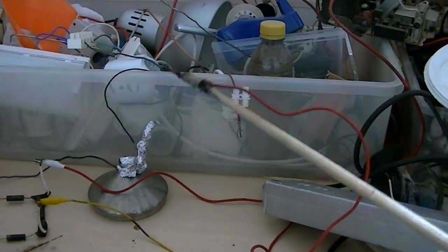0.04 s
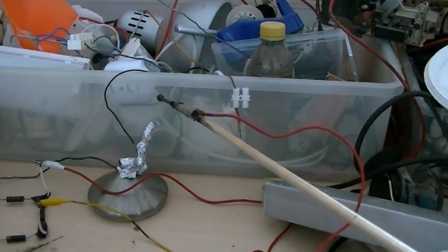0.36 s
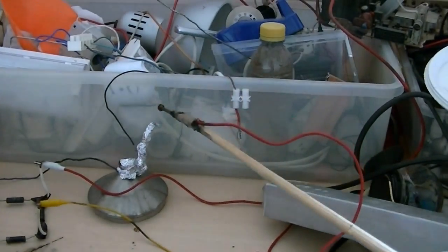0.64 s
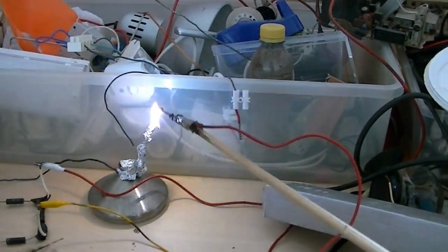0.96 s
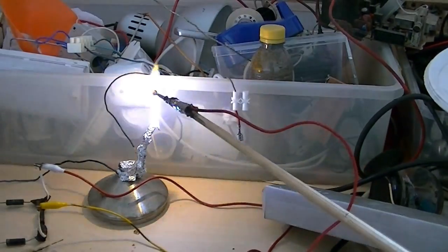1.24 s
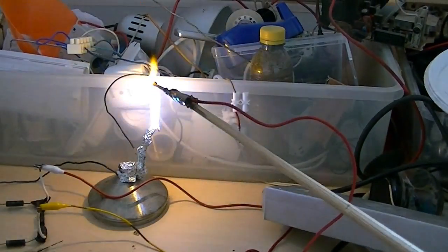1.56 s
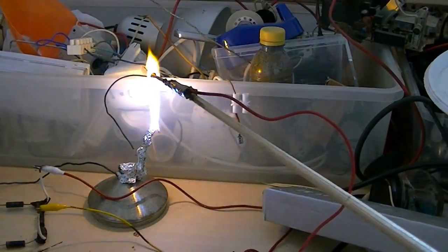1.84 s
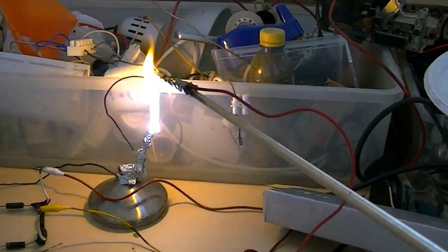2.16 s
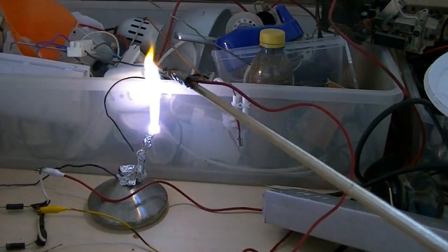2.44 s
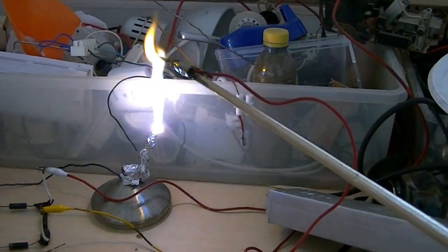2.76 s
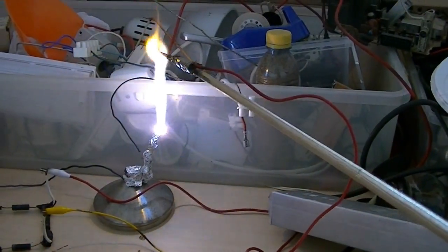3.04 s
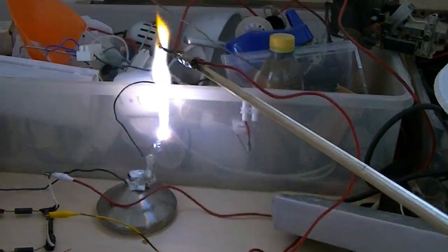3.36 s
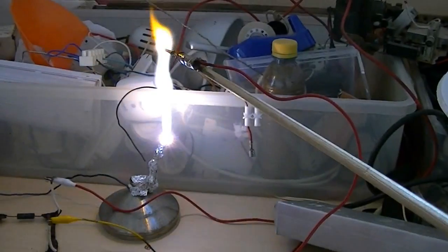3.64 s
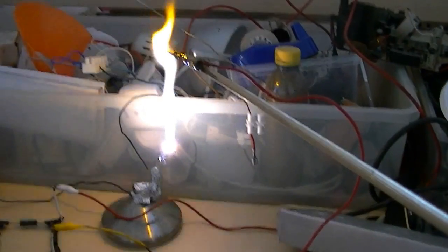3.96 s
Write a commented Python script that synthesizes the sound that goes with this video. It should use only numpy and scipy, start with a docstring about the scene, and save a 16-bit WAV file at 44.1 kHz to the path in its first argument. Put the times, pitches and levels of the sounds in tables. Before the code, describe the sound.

An electric arc strikes with a sharp snap after a faint transformer hum, then buzzes steadily, growing louder and deeper while hot metal sizzles and spits. Heard close up on a workbench in a small room.

```python
"""A high-voltage mains arc, drawn between two electrodes on a cluttered workbench in a small room.
From one close microphone: a thin fizz runs throughout, and the transformer hums until the gap breaks
down with a snap. The arc then relights on every half cycle, a buzz that deepens as the flame is pulled
longer and flickers, while the hot metal sizzles and spits. Snap and crackle echo off bench and boxes."""
import sys
import numpy as np
from scipy import signal
from scipy.fft import rfft, irfft, next_fast_len
from scipy.io import wavfile
from scipy.ndimage import uniform_filter1d

SR = 44100
rng = np.random.default_rng(int(sys.argv[2]) if len(sys.argv) > 2 else 0)


def unload_audio(sound):
    """Save the sound as a 16-bit wav file, at the path given as the first command line argument."""
    columns = np.transpose(np.atleast_2d(sound))
    # keep every value between -1 and 1, then stretch to whole-number steps
    steps = np.round(np.clip(columns, -1, 1) * 32767)
    wavfile.write(sys.argv[1], SR, steps.astype(np.int16))


N = 176400
T = np.arange(N) / SR
FFT_SIZE = next_fast_len(2 * N)
BIN_HZ = np.maximum(np.arange(FFT_SIZE // 2 + 1) * SR / FFT_SIZE, 1)

PULSE_HZ, RELIGHT_S, STRIKE_S = 100.1, .0014, .79  # two pulses per mains cycle; their offset; arc lit
BAND_CENTRES_HZ = (200, 500, 1100)  # bass, middle and top of the buzz
GRAINS_PER_S = 3500

# The arc lengthening. Each row: time in seconds, then bass, middle and top gain in dB.
ARC_GROWTH = [(.8, -20.5, -22, -20), (.87, -20, -21.5, -13.5), (.97, -19, -20, -12),
              (1.03, -10, -12.5, -5.5), (1.09, -6, -7.5, -6.5), (1.17, -4.5, -5, -3), (1.3, -1, -3.5, -5.5),
              (1.85, 2.5, -1.5, -3), (2.4, 3.5, -1, -3.5), (3.18, 6, -0.5, -4.5), (4, 7.5, 0, -6)]
# Unsteadiness of those three bands. Each row: swing in dB from flicker, from chance, from polarity.
BAND_SWINGS = [(.2, 0.24, 0.8), (1.1, -0.7, 0.34), (4.0, 0.13, 0.4)]
# Narrow bands of each buzz pulse that arrive late. Each row: centre in Hz, width in Hz.
BUZZ_SMEAR_BANDS = [(178, 45), (858, 57), (1190, 140)]
# Levels of the flame's mains throb, relighting ticks and sizzle. Each row: time in seconds, level in dB.
THROB_LEVELS = [(1.6, -74), (3, -53), (4, -63)]
TICK_LEVELS = [(.8, -48), (1.02, -64), (1.1, -49), (1.3, -48.5), (1.36, -42), (1.45, -48), (1.68, -51),
               (1.9, -45.5), (2.4, -49), (3.1, -48), (3.7, -49), (4, -45.5)]
SIZZLE_LEVELS = [(.8, -55), (.87, -46), (1.02, -37), (1.07, -49.5), (1.17, -48.5), (1.3, -61), (1.4, -53),
                 (1.68, -65), (1.87, -49.5), (2.22, -53), (2.25, -44), (2.31, -46.5), (2.6, -41),
                 (2.615, -45), (3.32, -47), (3.39, -42.5), (3.55, -47), (3.76, -45.5), (3.84, -57),
                 (4, -52)]
# The gap breaking down: leader, snap, restrike. Each row: start in seconds, level in dB.
SNAP_EVENTS = [(0.765, -13), (0.7831, 8), (0.8202, -12.5)]
# Modes of the electrode stand. Each row: frequency in Hz, level in dB, seconds to fall by 60 dB.
STAND_MODES = [(268, -36.5, 0.11), (470, -54, .1)]
# Spits of hot metal. Each row: start in seconds, level in dB.
SPIT_EVENTS = [(1.0128, -24), (1.4408, -19.5), (2.2400, -15.5), (2.2605, -18), (2.632, -26), (2.661, -24),
               (2.9586, -20), (3.0574, -20), (3.3183, -24), (3.3385, -3), (3.687, -20)]
# Showers of spattering metal. Each row: start in seconds, length in seconds, level in dB.
FLURRY_EVENTS = [(2.239, .014, -36), (2.287, 0.0072, -38.5), (2.33, .018, -42.5), (2.455, 0.019, -41),
                 (2.528, 0.0072, -45), (2.587, 0.019, -42), (3.354, 0.16, -46)]
# Transformer hum. Each row: multiple of the pulse rate, rms level in dB.
HUM_PARTIALS = [(1, -60.5), (2, -44), (3, -60.5)]
# Echoes off the bench and boxes. Each row: delay in seconds, relative level in dB.
BENCH_ECHOES = [(.00205, -6), (.0042, -13.5)]
# Tone colour of each source, from the arc to the room air. Each row: frequency in Hz, relative gain in dB.
PULSE_SPECTRUM = [(40, -98), (100, -25), (200, 0.16), (300, -17), (400, -4.5), (500, 1.5), (600, -4),
                  (700, -4.5), (800, -6), (900, -9), (1000, -6), (1100, -12.5), (1200, -8.5), (1300, -10),
                  (1400, -9), (1500, -17), (1600, -22.5), (1800, -52), (2400, -76), (6000, -83)]
FLAME_SPECTRUM = [(25, -78), (60, -6), (100, -39), (160, -17), (260, -13), (480, -8), (800, -13),
                  (1100, -11), (1450, -7.5), (1900, -21.5), (3500, -48)]
FLARE_SPECTRUM = [(200, -16), (600, 8), (950, -8), (1350, 2), (1750, -16), (2150, 2), (2600, -29),
                  (8000, -57)]
TICK_SPECTRUM = [(40, -75), (700, 5.5), (1800, -8), (2080, 5), (2450, 0), (3200, 3), (4400, -5.5),
                 (5600, -0.5), (6700, -0.5), (8400, -7), (9500, -10), (15000, -14)]
SNAP_SPECTRUM = [(40, -38), (150, -10), (260, -4), (600, -10), (1100, -17), (1800, -34), (3000, 2),
                 (3900, -7.5), (5200, 4.5), (6600, 3.5), (8200, 7.5), (10000, -0.5), (13500, 5.5),
                 (16000, -4.5)]
SPIT_SPECTRUM = [(60, -20), (500, -15), (1300, 19.5), (2200, 9.5), (4000, 7), (6700, 10), (9000, -0.5),
                 (12500, 1), (16000, -10)]
SIZZLE_SPECTRUM = [(40, -59), (300, -41), (1100, -19.5), (2080, 3.5), (2450, -1.5), (3000, 0.5),
                   (3700, -1.5), (4500, -3), (5600, 0.5), (5900, -6.5), (6750, 1), (7250, -5), (8400, 0),
                   (9100, -11.5), (13800, -8.5), (15800, -28)]
FLURRY_SPECTRUM = [(1500, -34), (4200, 3), (8400, -1), (10000, -4), (13500, -3), (16000, -11)]
KNOCK_SPECTRUM = [(60, -34), (150, -2), (300, -5), (900, -39)]
FIZZ_SPECTRUM = [(2000, 0), (4200, -10), (6600, 1.5), (8300, -0.5), (10300, -11.5), (13500, 0),
                 (16000, -24)]
AIR_SPECTRUM = [(15, -86), (25, -33), (146, -7), (224, -15.5), (373, -16.5), (475, -7.5), (673, -14.5),
                (1540, -14.5), (2300, -27), (4040, -28.5), (8100, -30), (10300, -33.5), (15000, -33)]


def arc_buzz(level_db=-27, flicker_lag_s=4e-5, polarity_lag_s=1.8e-5, jitter_s=1.1e-5):
    """One pressure pulse per relighting; flicker sharpens and delays it, and the two polarities differ."""
    times = relightings()
    polarity = (-1) ** np.arange(len(times)) * np.exp(-(times - STRIKE_S) / 1.6)
    phase, flicker = flame_flicker(times)
    onsets = times + flicker_lag_s * np.sin(phase) + polarity_lag_s * polarity
    onsets += jitter_s * rng.standard_normal(len(times))
    chance = rng.standard_normal(len(times))
    spectrum = 0
    for band, (flicker_db, chance_db, polarity_db) in enumerate(BAND_SWINGS):
        db = curve(ARC_GROWTH, times, column=band + 1)
        db += flicker_db * flicker + chance_db * chance + polarity_db * polarity
        band_weight = np.interp(BIN_HZ, BAND_CENTRES_HZ, np.eye(len(BAND_SWINGS))[band])
        spectrum += rfft(clicks(onsets, amp(db)), FFT_SIZE) * band_weight
    return amp(level_db) * SR / PULSE_HZ / np.sqrt(2) * colour(irfft(spectrum)[:N], PULSE_SPECTRUM)


def relightings():
    """Times at which the arc lights again, one per half cycle."""
    times = RELIGHT_S + np.arange(int(N / SR * PULSE_HZ) + 1) / PULSE_HZ
    return times[times > STRIKE_S]


def smear(buzz):
    """Narrow bands of each buzz pulse arrive milliseconds late, softening its edge."""
    for hz, width_hz in BUZZ_SMEAR_BANDS:
        radius = np.exp(-np.pi * width_hz / SR)
        poles = [1, -2 * radius * np.cos(2 * np.pi * hz / SR), radius * radius]
        buzz = signal.lfilter(poles[::-1], poles, buzz)  # all-pass
    return buzz


def flame_flicker(times, start_s=1.15, rise_s=.12, fade_s=1.5, rate_hz=14, glide_hz_per_s=.42):
    """Phase and swing of the flame's flicker, which quickens slightly as it dies away."""
    from_crest, age = times - 2.083, times - start_s
    phase = 2 * np.pi * from_crest * (rate_hz + .5 * glide_hz_per_s * from_crest)
    return phase, np.cos(phase) * np.clip(age / rise_s, 0, 1) * np.exp(-age / fade_s)


def flame():
    """A turbulent rush growing with the arc, a faint mains throb and a flare as the electrode ignites."""
    turbulence = noise(FLAME_SPECTRUM, throb(swing_db=1, lag_s=.006))
    rush = amp(-40 + curve(ARC_GROWTH, T, column=2)) * turbulence
    mains = amp(curve(THROB_LEVELS, T)) * np.sin(np.pi * PULSE_HZ * T)
    flare = swell(peak_s=1.2, width_s=.066, db=-42) * noise(FLARE_SPECTRUM)
    return (rush + mains + flare) * (T > STRIKE_S)


def ticks(lag_s=.00024, jitter_s=.000134, spread_db=3.5):
    """Each relighting gives a small tick of uneven strength and timing."""
    times = relightings()
    times = times + lag_s + jitter_s * rng.standard_normal(len(times))
    gains = amp(spread_db * np.clip(rng.standard_normal(len(times)), -2, 2))
    train = convolve(clicks(times, gains), crack(decay_s=.00052))
    return amp(curve(TICK_LEVELS, T)) * rms_one(colour(train, TICK_SPECTRUM))


def sparks(events, tone):
    """One short crack each time the gap breaks down or the metal spits."""
    times, db = np.transpose(events)
    train = np.bincount((times * SR).astype(int), amp(db), N)
    return colour(convolve(train, crack(decay_s=.0006)), tone)


def crack(decay_s):
    """A spark's very short burst, with an even spectrum and unit energy."""
    burst = flatten(rng.standard_normal(N) * np.exp(-T / decay_s))[:SR // 50]
    return burst / np.linalg.norm(burst)


def stand_ring():
    """The electrode stand shudders with a brief low ring at the loudest snap."""
    times, snap_db = np.transpose(SNAP_EVENTS)
    age = np.maximum(T - times[np.argmax(snap_db)], 0)
    return sum(amp(db - 60 * age / t60) * np.sin(2 * np.pi * hz * age) for hz, db, t60 in STAND_MODES)


def sizzle(grain_spread_db=6.5, cycle_spread_db=2.2, lag_s=.0033):
    """Dense tiny bursts from the hot metal, strongest while current flows, uneven between half cycles."""
    sizes = amp(grain_spread_db * np.minimum(rng.exponential(1, N), 3)) * rng.choice([-1, 1], N)
    grains = sizes * (rng.random(N) < GRAINS_PER_S / SR) * throb(swing_db=7.5, lag_s=lag_s)
    times = relightings()
    cycle_db = cycle_spread_db * rng.uniform(-.9, 1, len(times))
    grains *= amp(np.interp(T, times + lag_s, cycle_db))
    return amp(curve(SIZZLE_LEVELS, T)) * (T > STRIKE_S) * rms_one(colour(grains, SIZZLE_SPECTRUM))


def flurries(rise_s=.001, fall_s=.002):
    """The metal spatters in short showers of bright grains that start and stop abruptly."""
    gate = sum(amp(db) * np.clip((T - start) / rise_s, 0, 1) * fade_after(start + length, fall_s)
               for start, length, db in FLURRY_EVENTS)
    grains = rng.standard_normal(N) * (rng.random(N) < GRAINS_PER_S / SR)
    return gate * rms_one(colour(grains, FLURRY_SPECTRUM))


def handling(ring_hz=481):
    """A soft knock and a faint ring while the stick is brought up to the electrode."""
    knock = swell(peak_s=.043, width_s=.012, db=-39) * noise(KNOCK_SPECTRUM)
    ring = swell(peak_s=.533, width_s=.047, db=-46) * np.sin(2 * np.pi * ring_hz * T)
    return knock + ring


def transformer_hum():
    """The idle transformer hums at multiples of the pulse rate until the arc strikes."""
    hum = sum(amp(db) * np.sqrt(2) * np.sin(2 * np.pi * k * PULSE_HZ * T) for k, db in HUM_PARTIALS)
    return hum * fade_after(STRIKE_S, fall_s=.015)


def tip_fizz():
    """The live tips fizz thinly throughout, in step with the mains."""
    return amp(-53) * noise(FIZZ_SPECTRUM, throb(swing_db=15, lag_s=.0016))


def bench(sound, echo_db, clutter_db, room_db):
    """Paths to the microphone: direct sound, two near echoes, scatter from clutter, a small room."""
    delays, db = np.transpose(BENCH_ECHOES)
    scatter = amp(clutter_db) * tail(t60_s=.02) + amp(room_db) * tail(t60_s=.21)
    late_scatter = np.interp(T - delays[0], T, scatter, left=0)
    response = flatten((T == 0) + late_scatter) + clicks(delays, amp(db + echo_db))
    return convolve(sound, response)


def tail(t60_s):
    """Scattered reflections as dying noise of unit energy."""
    return rms_one(rng.standard_normal(N) * amp(-60 * T / t60_s)) / np.sqrt(N)


def room_air():
    """Quiet, steady room tone behind the bench."""
    return amp(-46.5) * noise(AIR_SPECTRUM)


def amp(db):
    """Decibels to gain."""
    return 10 ** (np.asarray(db) / 20)


def rms_one(x):
    """Scale to unit rms."""
    return x / np.sqrt(np.mean(x ** 2) + 1e-20)


def curve(rows, times, column=1):
    """One column of a table, interpolated at the given times."""
    rows = np.array(rows)
    return np.interp(times, rows[:, 0], rows[:, column])


def throb(swing_db, lag_s):
    """Gain that swells once in every half cycle of the mains."""
    return amp(swing_db * np.cos(2 * np.pi * PULSE_HZ * (T - RELIGHT_S - lag_s)))


def swell(peak_s, width_s, db):
    """Bell-shaped gain."""
    return amp(db) * np.exp(-((T - peak_s) / width_s) ** 2)


def fade_after(end_s, fall_s):
    """Full gain until end_s, then a straight fall to silence."""
    return np.clip((end_s - T) / fall_s + 1, 0, 1)


def clicks(times, gains):
    """Impulses, each shared between its two nearest samples."""
    whole, part = np.divmod(np.clip(times, 0, None) * SR, 1)
    whole = whole.astype(int)
    return np.bincount(whole, gains * (1 - part), N)[:N] + np.bincount(whole + 1, gains * part, N)[:N]


def noise(tone, envelope=1):
    """Noise shaped by an envelope, then coloured, at unit rms."""
    return rms_one(colour(rng.standard_normal(N) * envelope, tone))


def convolve(x, response):
    """Convolution cut to the length of the scene."""
    return signal.fftconvolve(x, response)[:N]


def colour(x, tone):
    """Minimum-phase filter with the given (Hz, dB) shape."""
    hz, db = np.transpose(tone)
    cepstrum = irfft(np.log(amp(np.interp(np.log(BIN_HZ), np.log(hz), db))))
    cepstrum[1:FFT_SIZE // 2] *= 2
    cepstrum[FFT_SIZE // 2 + 1:] = 0
    return irfft(rfft(x, FFT_SIZE) * np.exp(rfft(cepstrum)))[:N]


def flatten(x):
    """Smooth the broad humps and hollows out of a spectrum, keeping the energy."""
    power = uniform_filter1d(np.abs(rfft(x, FFT_SIZE)) ** 2, size=2400)
    return colour(x, np.column_stack([BIN_HZ, -10 * np.log10(power / power.mean())]))


def scene():
    """In mono: buzz and flame up front, snap and crackle echoing round the bench, hum and air behind."""
    snap = bench(sparks(SNAP_EVENTS, SNAP_SPECTRUM), echo_db=-1.5, clutter_db=-23, room_db=-9)
    crackle = sizzle() + flurries() + ticks() + sparks(SPIT_EVENTS, SPIT_SPECTRUM)
    crackle = bench(crackle, echo_db=-6, clutter_db=-3.5, room_db=-5)
    arc = smear(arc_buzz()) + flame() + stand_ring() + snap + crackle
    return (arc + handling() + transformer_hum() + tip_fizz() + room_air())[None]


def record(dry):
    """The microphone chain rounds off the sharpest peak and cuts the very top."""
    ceiling, stopband_hz = .6, 16700
    rounded = dry / (1 + (dry / ceiling) ** 6) ** (1 / 6)
    return signal.sosfilt(signal.cheby2(20, 70, stopband_hz, fs=SR, output="sos"), rounded)


dry = scene()
out = record(dry)
unload_audio(out)
```